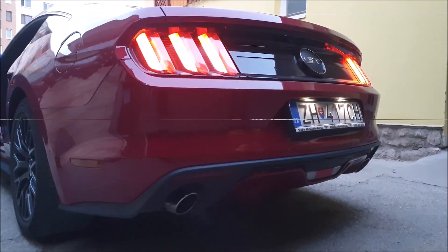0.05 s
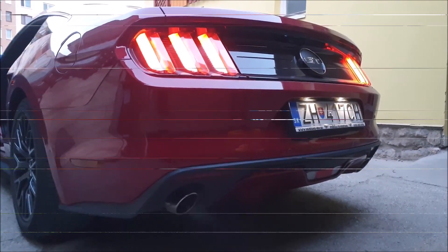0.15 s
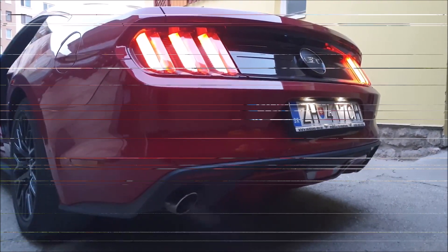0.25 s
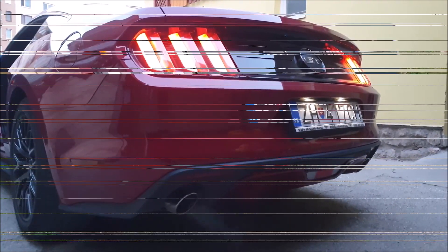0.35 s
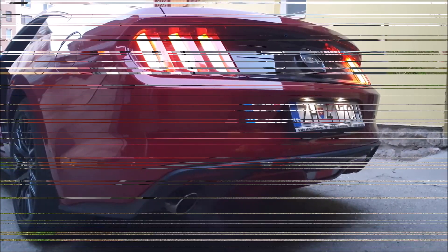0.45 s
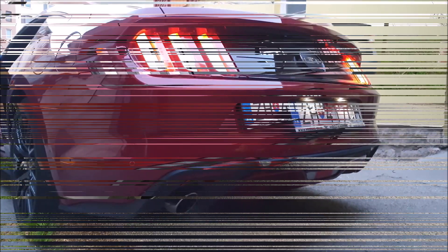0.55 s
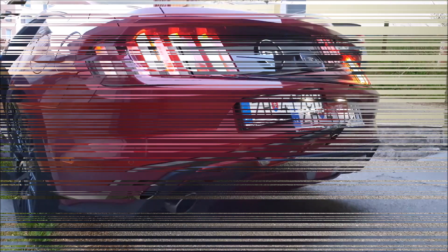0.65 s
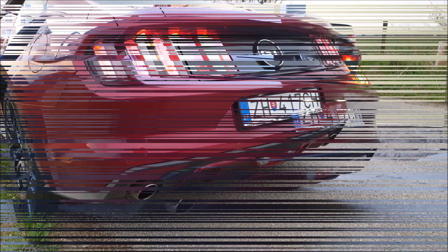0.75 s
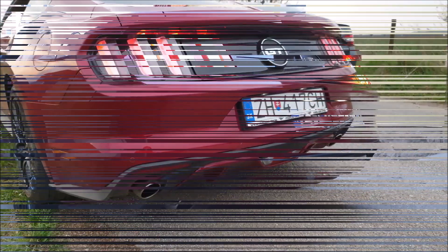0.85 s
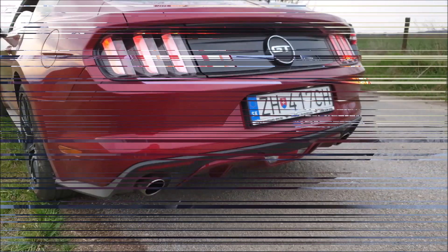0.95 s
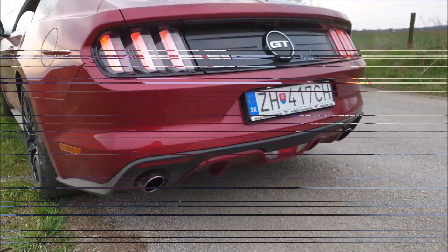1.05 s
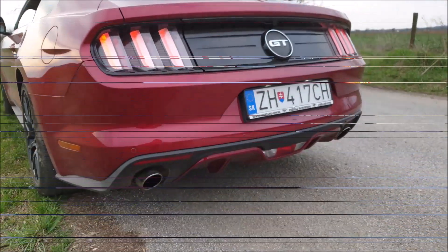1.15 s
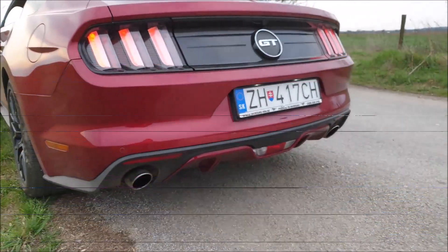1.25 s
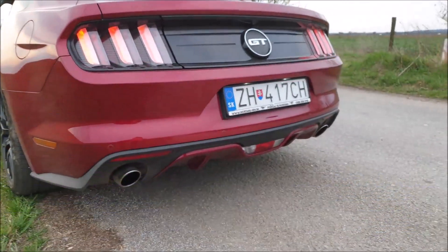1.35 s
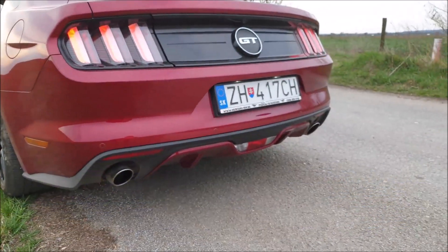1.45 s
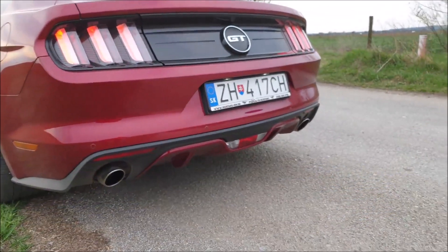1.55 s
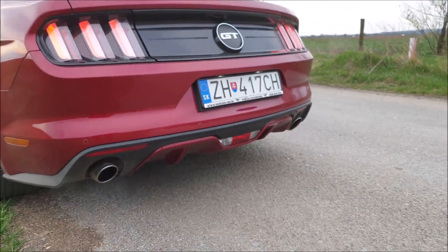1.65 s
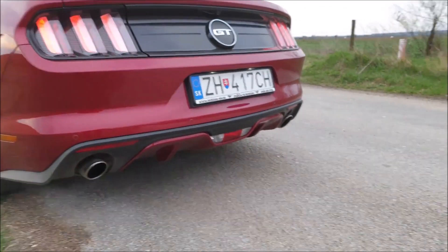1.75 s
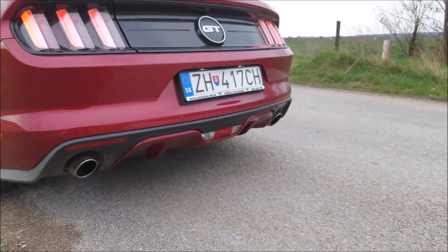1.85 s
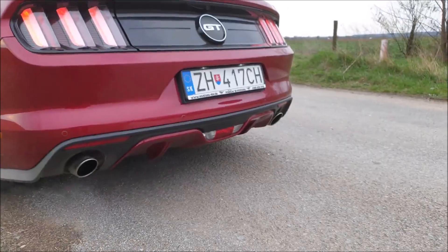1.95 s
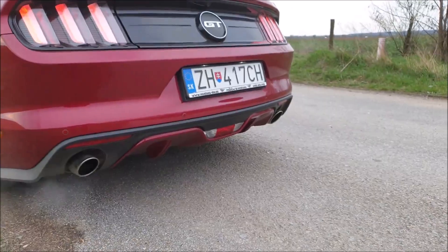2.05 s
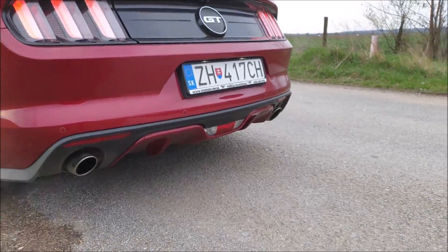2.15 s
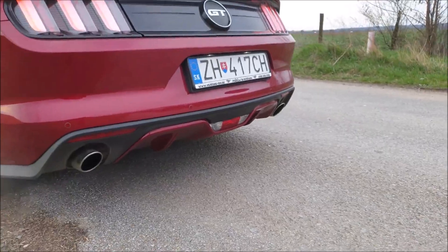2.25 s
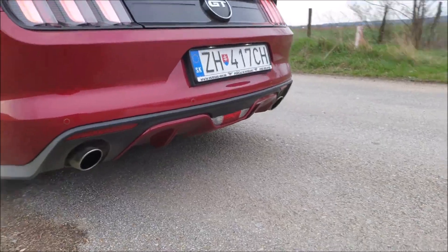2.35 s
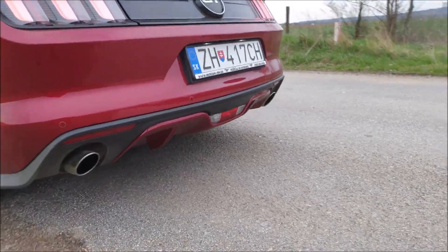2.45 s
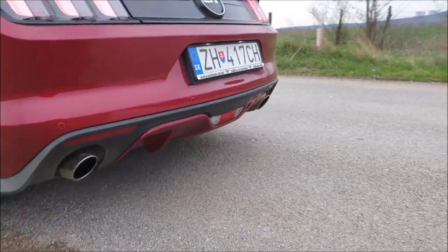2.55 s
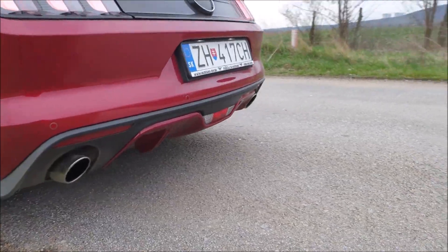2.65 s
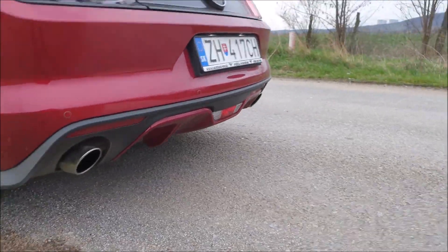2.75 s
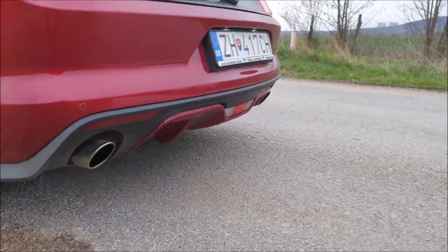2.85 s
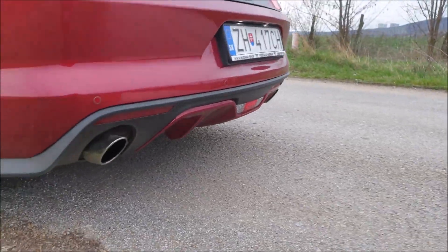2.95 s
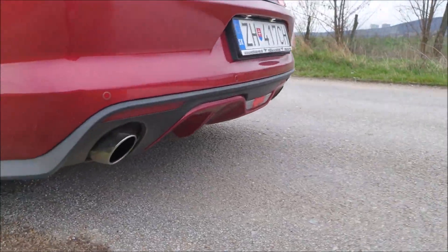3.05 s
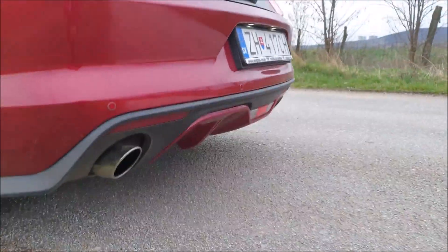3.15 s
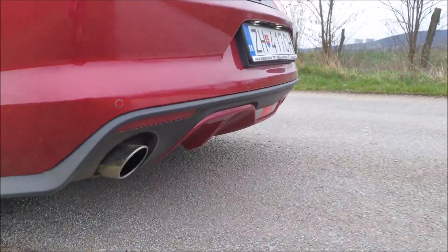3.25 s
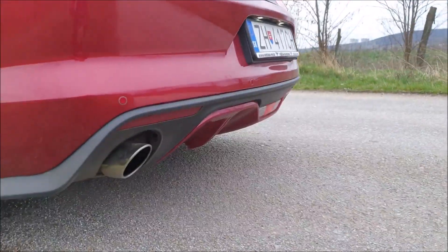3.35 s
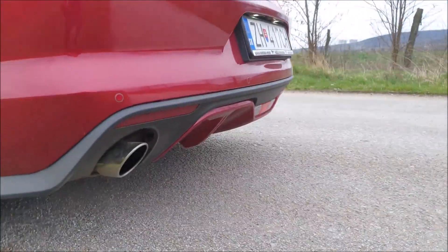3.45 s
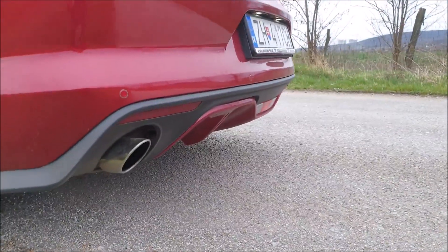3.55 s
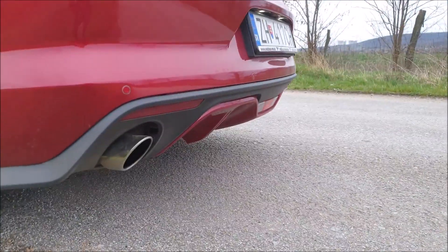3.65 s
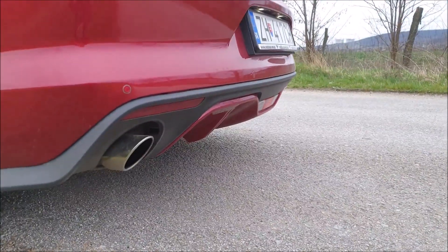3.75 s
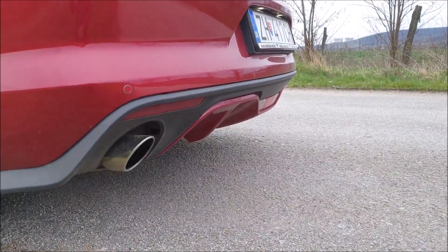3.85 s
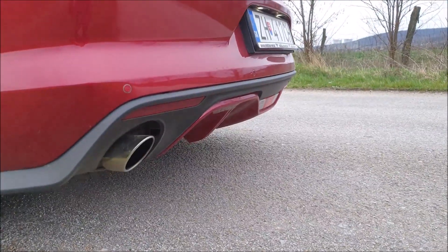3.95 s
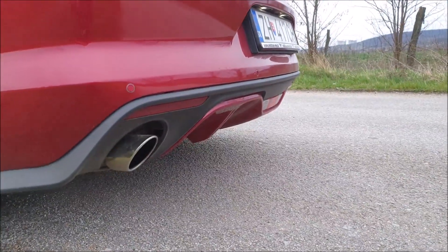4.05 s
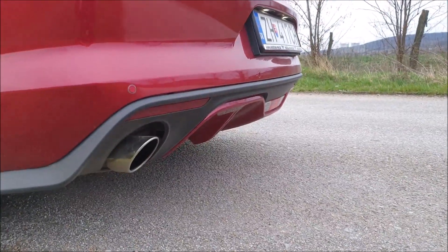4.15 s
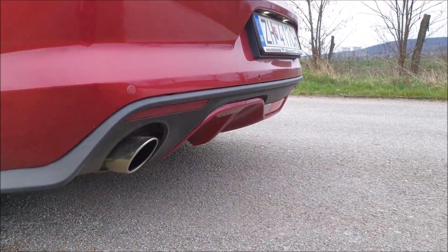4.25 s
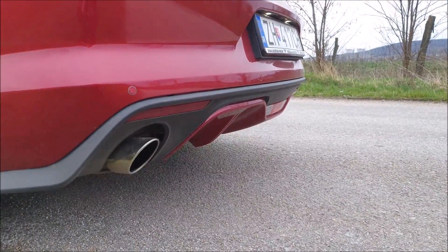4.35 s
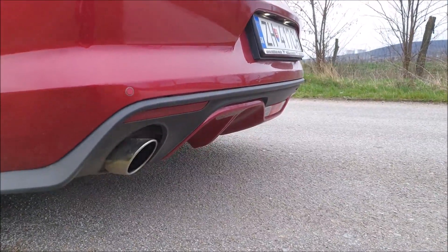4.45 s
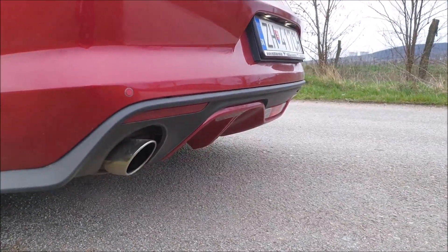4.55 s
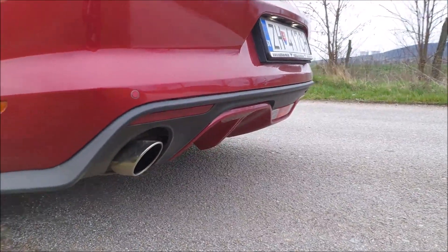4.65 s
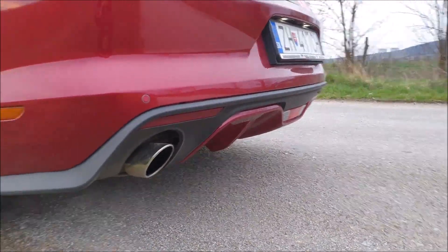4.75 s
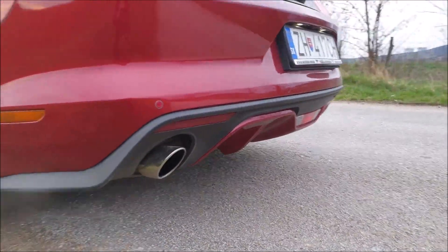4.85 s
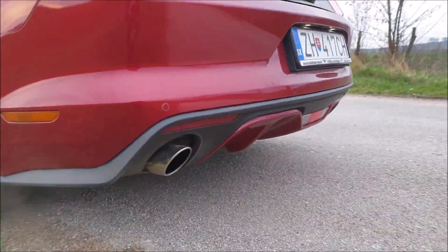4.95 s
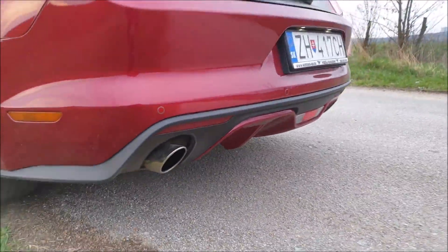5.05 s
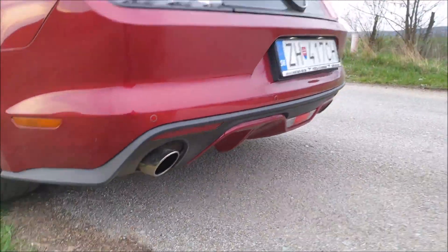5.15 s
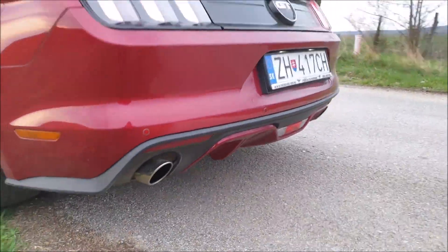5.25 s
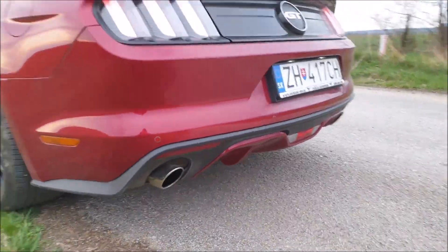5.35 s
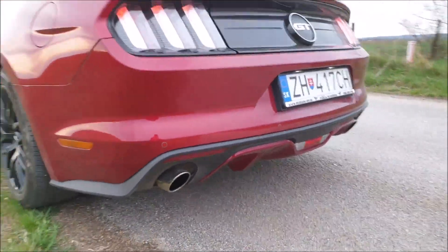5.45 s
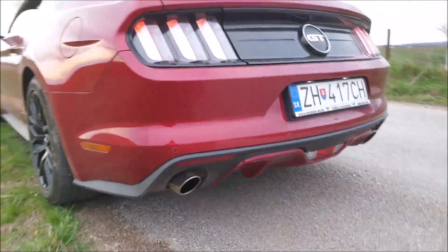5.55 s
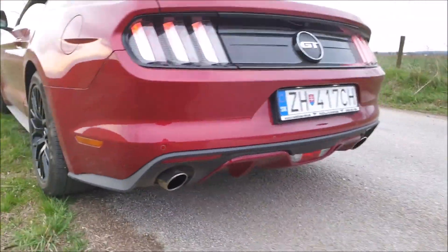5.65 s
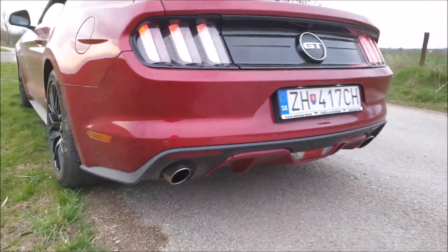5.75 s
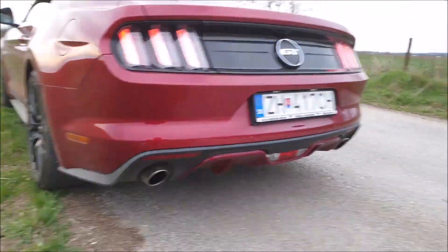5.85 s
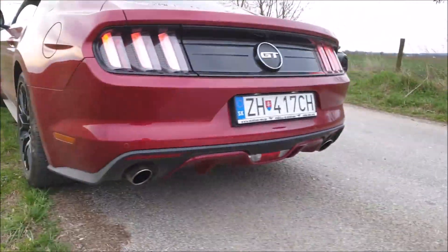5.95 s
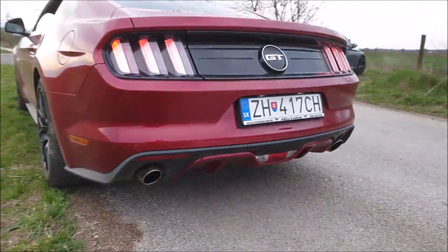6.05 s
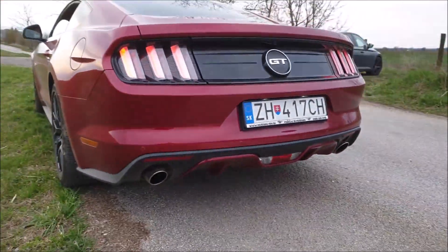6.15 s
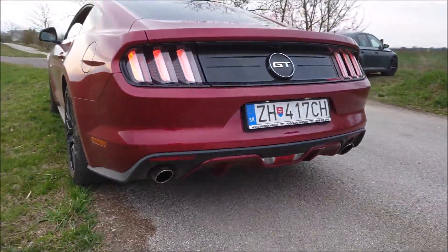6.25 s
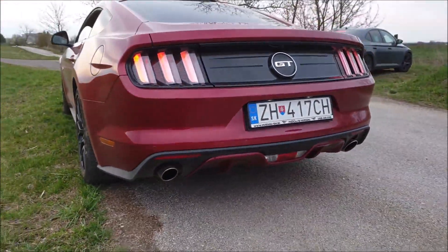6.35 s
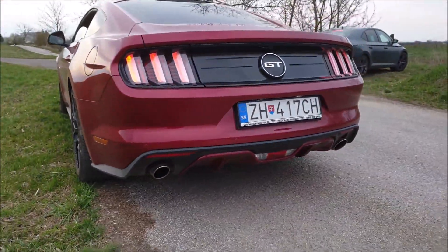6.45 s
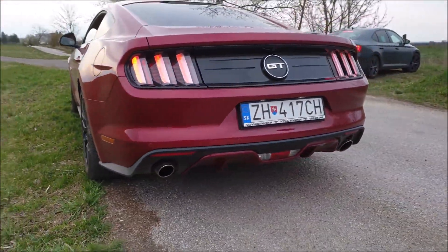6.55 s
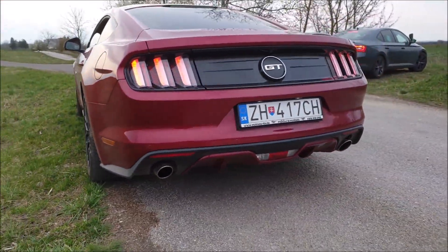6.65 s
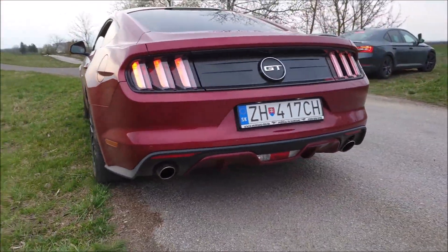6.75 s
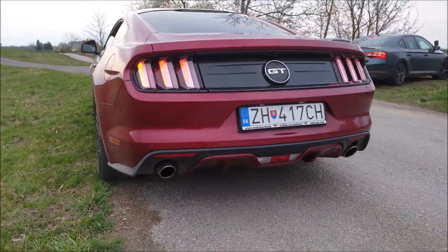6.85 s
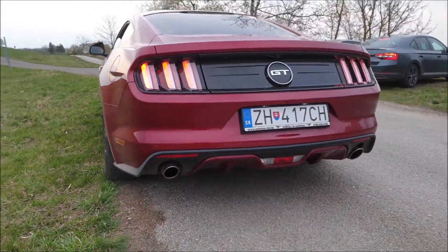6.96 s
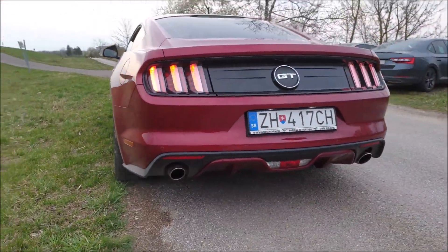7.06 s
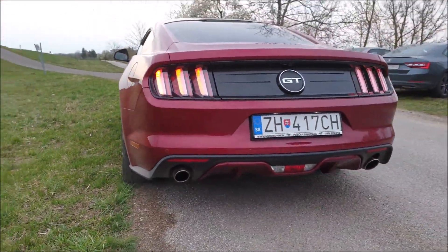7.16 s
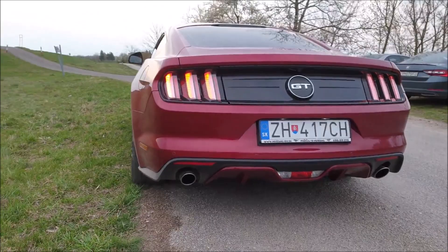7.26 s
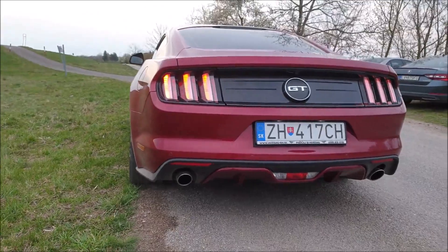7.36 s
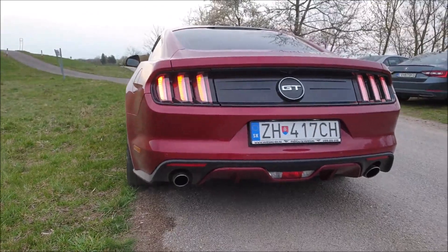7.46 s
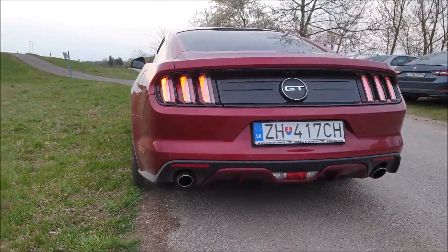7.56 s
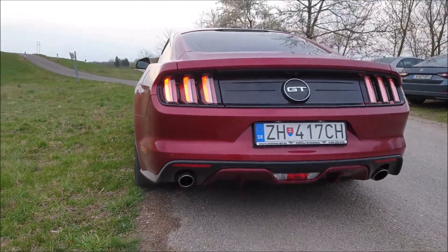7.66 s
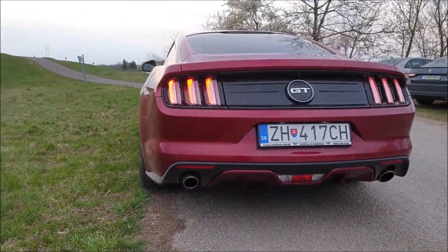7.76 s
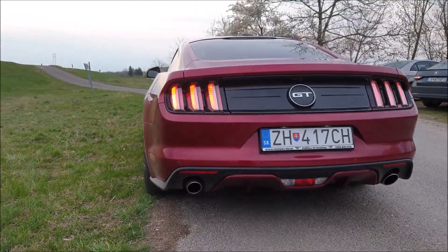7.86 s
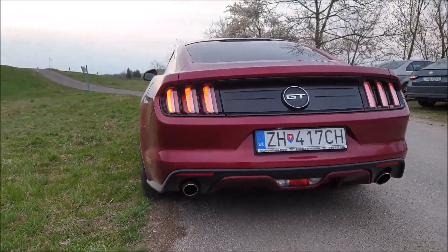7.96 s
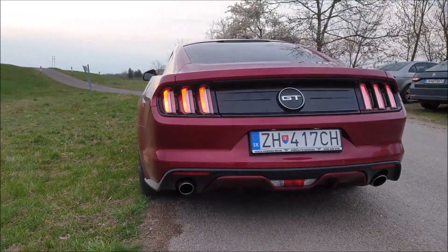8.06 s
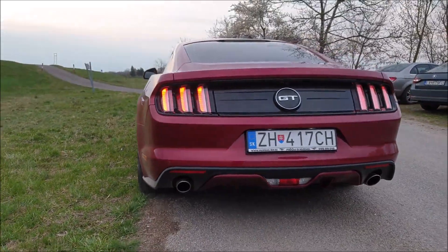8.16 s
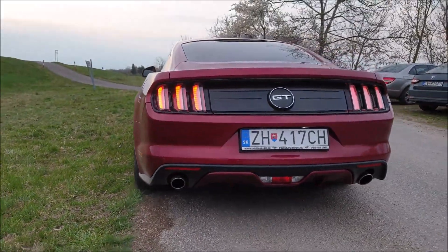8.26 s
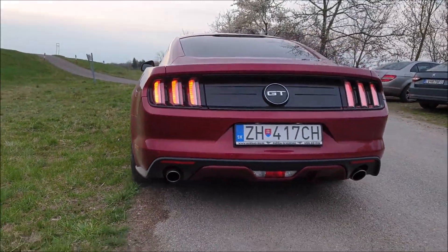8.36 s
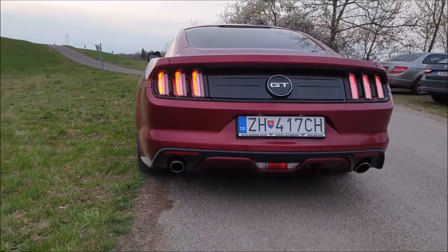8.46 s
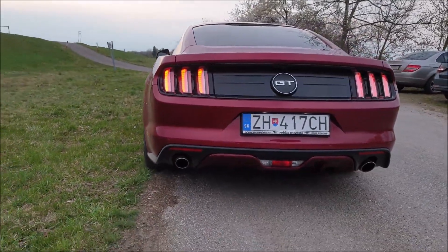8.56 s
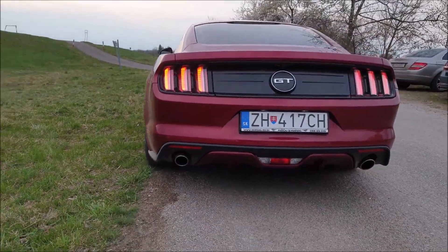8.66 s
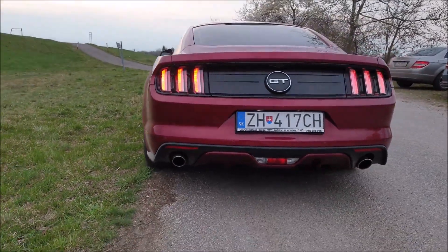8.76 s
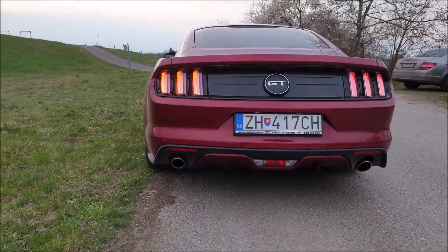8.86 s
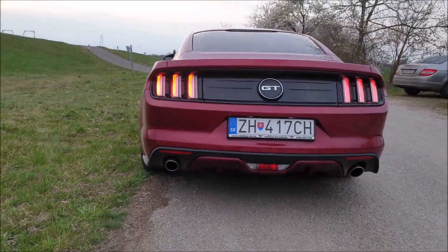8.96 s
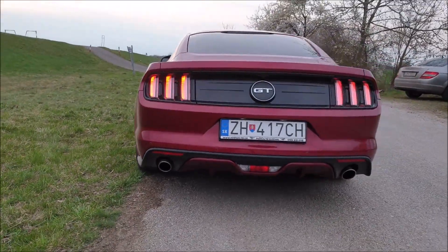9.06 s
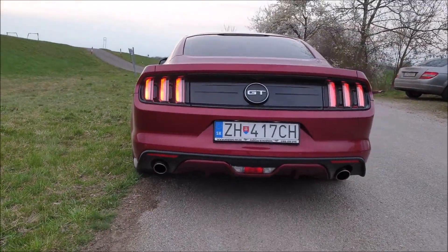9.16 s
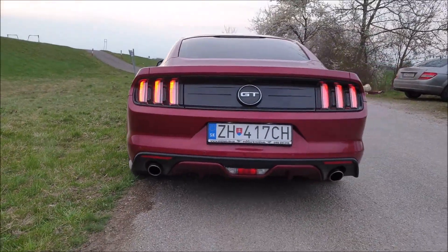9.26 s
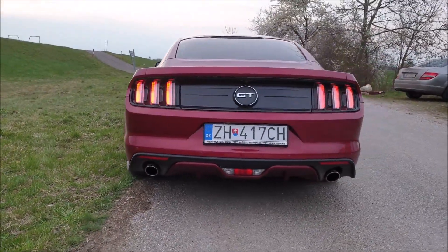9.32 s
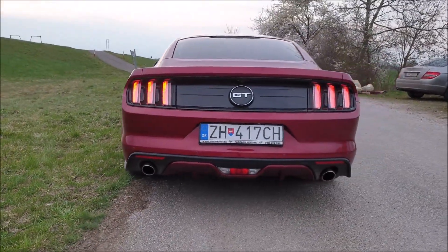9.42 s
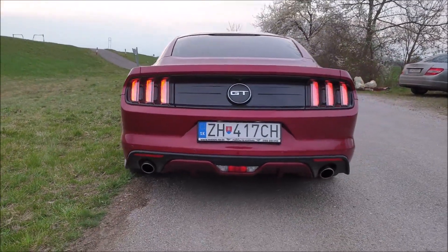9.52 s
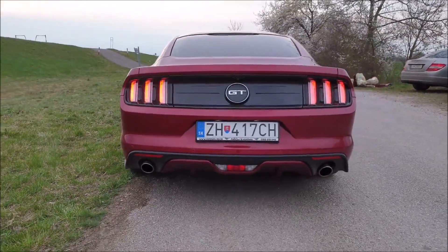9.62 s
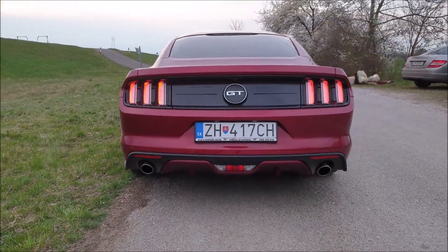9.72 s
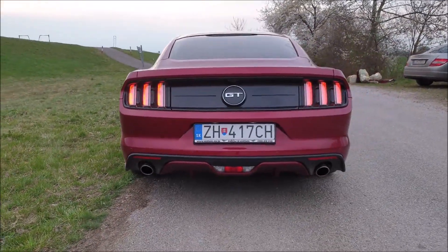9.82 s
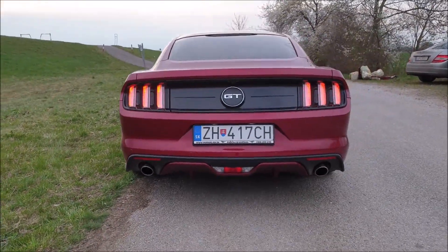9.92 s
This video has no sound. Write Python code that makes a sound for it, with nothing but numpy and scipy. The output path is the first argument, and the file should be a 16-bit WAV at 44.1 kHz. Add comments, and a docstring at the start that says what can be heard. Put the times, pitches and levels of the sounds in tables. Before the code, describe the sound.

Close to a sports car tailpipe: steady quick idle, three raspy revs, popping overrun after each, then a slowing burble as the listener backs away.

```python
"""A V8 idles fast in a yard; that scene ends under a second one on an open road, where the engine is
revved three times near the left tailpipe, crackles as it slows, and burbles while the listener backs away.
Firings give orders of the engine cycle; uneven burning is noise gated by the firings, which rumbles.
Noise through resonances that rise with gas heat makes the pipe ring and the tips rasp; fuel pops are
short bursts of the same noise, and a band of high noise is the jet."""
import sys
import numpy as np
from scipy import signal
from scipy.io import wavfile
from scipy.ndimage import uniform_filter1d, map_coordinates

SR = 44100
rng = np.random.default_rng(int(sys.argv[2]) if len(sys.argv) > 2 else 0)


def dump(signal):
    """Clip the signal to [-1, 1] and save it as 16-bit WAV at the path in sys.argv[1]."""
    limited = np.clip(np.atleast_2d(signal).T, -1, 1)
    pcm = np.round(limited * 32767).astype(np.int16)
    wavfile.write(sys.argv[1], SR, pcm)


N = 440547
T = np.arange(N) / SR
COARSE = 8  # engine orders are computed at one sample in eight

# firing slots, out of eight per cycle, that reach the near pipe: [slot]
NEAR_BANK = [0, 2, 3, 5]
# steadiness of the tips, heard as a steady hiss from farther back: [t/s, share 0-1]
CALM = [(6.6, 0), (7.1, 1)]


def amp(db):
    """Decibels to gain."""
    return 10 ** (np.asarray(db) / 20)


def columns(rows, t=T):
    """Every column of a curve table at the times t."""
    s, *values = np.transpose(rows)
    return [np.interp(t, s, v) for v in values]


def read(points, hz):
    """A spectrum table on a log-frequency axis."""
    f, value = np.transpose(points)
    return np.interp(np.log(hz + 1), np.log(f + 1), value)


def peaks(modes, hz):
    """Gain of a set of resonances with steep skirts."""
    power = 0
    for f, width, db in modes:
        power = power + amp(db) ** 2 / (1 + (2 * (hz - f) / width) ** 2) ** 1.4
    return np.sqrt(power)


def waver(length):
    """Slow chance of rms 1: a smooth curve through random knots 450 values apart."""
    knots = rng.standard_normal(length // 450 + 2)
    slow = map_coordinates(knots, [np.arange(length) / 450], order=3, mode="nearest")
    return slow / slow.std()


def throttle(t):
    """Throttle opening 0-1, and gas heat as a factor on resonances: it builds under load, then cools."""
    # throttle blips: [opens/s, shuts/s, rise of the resonances with heat/share]
    blips = [(.8, 1.28, .1), (2.36, 2.9, .16), (4.82, 5.28, .16)]
    pedal_s, heat_lag_s, cool_s = .14, .08, .15
    opening, heat = 0, 1
    for opens, shuts, rise in blips:
        pressed = np.clip((t - opens) / pedal_s, 0, 1)
        released = np.clip((t - shuts) / pedal_s, 0, 1)
        opening = opening + pressed * (1 - released)
        warmed = np.clip((t - opens - heat_lag_s) / (shuts - opens - heat_lag_s), 0, 1)
        cooling = np.exp(-np.maximum(t - shuts, 0) / cool_s)
        heat = heat + rise * np.sin(np.pi / 2 * warmed ** 0.68) * cooling
    return opening, heat


def gas(shape, size, drift=0):
    """Two-port turbulence of rms 1; hot gas carries sound faster, so the whole spectrum slides up."""
    # likeness of the two ports: [f/Hz, share 0-1]
    likeness = [(30, 0.91), (70, 0.81), (130, 0.96), (500, 0.87), (1200, 0.98), (2500, 0.78), (4500, 0.57),
                (8000, 0.12), (15000, 0.22)]
    # left over right: [f/Hz, level/dB]
    lean_table = [(60, -0.5), (150, -0.5), (380, -2), (950, 1), (2380, -2), (5980, -1.5), (15000, 0)]
    hop = size // 2
    hz = np.fft.rfftfreq(size, 1 / SR)[:, None]
    t = np.arange(N // hop + 5) * hop / SR
    opening, heat = throttle(t)
    # pockets of hot and cool gas, felt less with open throttle and from farther back
    knots_s = np.arange(0, t[-1] + .1, .06)
    pockets = np.interp(t, knots_s, rng.standard_normal(len(knots_s)))
    slide = heat + drift * (1 - 0.76 * opening - columns(CALM, t)[0]) * pockets
    fine_hz = np.arange(0, SR, 5.)
    gain = np.interp(hz / slide, fine_hz, shape(fine_hz))

    a, b, c, d = rng.standard_normal((len(t), len(hz), 4), dtype=np.float32).T
    left, other = a + 1j * b, c + 1j * d
    same = np.clip(read(likeness, hz), 0, 1)
    right = same * left + np.sqrt(1 - same ** 2) * other
    lean = amp(read(lean_table, hz) / 2)
    z = np.array([left * lean, right / lean]) * gain / np.linalg.norm(gain, axis=0)
    out = signal.istft(z.astype(np.complex64), window="cosine", nperseg=size, noverlap=size - hop)[1][:, :N]
    return out / out.std()


def order(k, turns):
    """One order of the cycle at rms 1, phased so that the orders add up to the near bank's pulses."""
    phase = np.angle(sum(amp(-slot) * np.exp(-2j * np.pi * k * slot / 8) for slot in NEAR_BANK))
    spread = .045 * k ** 2  # the long pipe smears each pulse
    return np.sqrt(2) * np.cos(2 * np.pi * k * turns + phase - spread)


def puffs(turns, spread_db, between, size):
    """Envelope, levelled to rms 1, that flares unevenly at near-bank firings; size/samples softens it."""
    slot = (8 * turns).astype(int)
    every = np.arange(slot[-1] + 1)
    strength = amp(spread_db * rng.standard_normal(len(every))) * np.isin(every % 8, NEAR_BANK)
    flare = between + strength[slot] * np.exp(-2.5 * (8 * turns - slot))
    flare = uniform_filter1d(uniform_filter1d(flare, size=size), size=size)
    return flare / np.sqrt(uniform_filter1d(flare ** 2, size=8000))


def yard():
    """Fast even idle: wavering orders of a steady cycle and a soft puffing hiss; it stops short."""
    # engine orders before the fade: [order of the cycle, rms level/dB]
    idle_orders = [(3, -12), (4, -27), (5, -26), (6, -27.5), (7, -20.5), (8, -19), (9, -44), (10, -59),
                   (11, -14.5), (12, -45), (13, -24), (14, -61), (15, -20), (16, -49), (17, -27),
                   (18, -25.5), (19, -55), (20, -32), (21, -32), (23, -37), (24, -58), (26, -56), (27, -65),
                   (30, -53), (31, -37), (32, -37), (34, -52), (35, -34), (36, -68), (50, -69), (53, -60),
                   (54, -48.5), (55, -54.5)]
    # hiss spectrum, relative: [f/Hz, density/dB per Hz]
    hiss_shape = [(150, -34), (250, 1), (287, -1), (366, -5), (427, -18), (563, -13.5), (625, -23),
                  (693, -18.5), (1070, -16), (1230, -23.5), (2250, -29), (3230, -34.5), (15600, -48)]
    # course of the whole idle: [t/s, gain/dB]
    idle_fade = [(0, -2.5), (.6, -3), (.615, -3), (.65, -4.5), (.75, 0), (.9, -1.5), (1.05, 0.5),
                 (1.2, -4.5), (1.38, -3)]
    cycle_hz, end_s, hiss_db = 10.32, 1.3826, -28
    turns = cycle_hz * T + .3
    part = turns[:round(end_s * SR):COARSE]
    tone = sum(amp(db + 1.2 * waver(len(part))) * order(k, part) for k, db in idle_orders)
    tone = signal.resample_poly(tone, COARSE, 1)
    hiss = amp(hiss_db) * puffs(turns, 3.5, 1.0, size=60)
    hiss = hiss * gas(lambda hz: amp(read(hiss_shape, hz)), size=1024)
    fade = amp(columns(idle_fade)[0]) * (T < end_s)
    return (np.pad(tone, (0, N - len(tone))) + hiss) * fade


def beat(hz, turns, place, uneven):
    """Orders at rms 1 before break-up: throttle and place balance them, the silencer colours them."""
    # balance of orders 1 to 18, one row each, relative: [open throttle/dB, shut throttle/dB,
    # a few steps back/dB, between both pipes/dB, loping near idle/dB]
    balance = [(10.5, -3, -15, -30, -30), (-1.5, -45, -20, -29, -19), (2.5, 1, -0.5, -14, -6),
               (-17, -53, -24, -1.5, -4), (5, -1.5, -4.5, -25, -33), (1, -33, -19, -4, 5.5),
               (-7, -11, -28, -18, -29), (-2, -12.5, -14, 2, -3.5), (-8, -14.5, -15, -8, -17),
               (-2, -15, -10.5, -9, -2), (-9, -15.5, -17, -7, -30), (-1.5, -19, -27, -36, -16),
               (-24, -41, -23, -13, -17), (-12.5, -39, -34, -7.5, -22), (-1, -22.5, -42, -19, -15),
               (-8, -46, -35, -24, -29), (-14.5, -47, -28, -36, -36), (-8, -57, -40, -28, -22)]
    # orders 19 to 26, same columns
    top_orders = [(-11, -45, -45, -45, -45)] * 8
    # silencer response: [f in cool gas/Hz, gain/dB]
    silencer = [(30, -17), (55, -3), (95, -0.5), (125, 1.5), (160, 7.5), (190, 2.5), (225, 3.5), (262, -3),
                (290, 5.5), (320, 3), (345, 1), (375, -3), (420, 2.5), (480, -13.5), (635, 2.5), (705, -4),
                (772, 3), (900, -14.5), (1200, 8), (1500, -14)]
    # loping balance while leaving idle: [t/s, share 0-1]
    lope_curve = [(.93, 1), (1.03, 0)]
    turning = 3  # this order reverses its phase as the throttle shuts
    heat = throttle(T)[1]
    hz, turns, place, uneven, heat = (v[::COARSE] for v in (hz, turns, place, uneven, heat))
    lope = columns(lope_curve, T[::COARSE])[0]
    out, power = 0, 0
    for k, dbs in enumerate(balance + top_orders, 1):
        placed = np.interp(place, np.arange(len(dbs)), amp(dbs))
        size = (1 - lope) * placed + lope * amp(dbs[-1])
        size = size * amp(read(silencer, k * hz / heat))
        gain = size * np.clip(2 * place - 1, -1, 1) if k == turning else size
        broken = amp((.5 + 2.5 * uneven) * (waver(len(hz)) - .2))
        out = out + gain * broken * order(k, turns)
        power = power + size ** 2
    return signal.resample_poly(out / np.sqrt(power), COARSE, 1)[:N]


def boom(turns, opening, sputter, lumps, calm, rumble):
    """Low exhaust note: even burning beats in orders, uneven burning puffs the rumble."""
    # engine speed: [t/s, cycle rate/Hz]
    speed = [(.6, 10.2), (.71, 14.2), (.8, 19.5), (.9, 25), (1.05, 27.5), (1.18, 36.6), (1.3, 41.6),
             (1.38, 41.4), (2.2, 31), (2.4, 31.2), (2.55, 36), (2.87, 57), (2.95, 57.8), (4, 40.6),
             (4.5, 34.5), (4.82, 31.6), (4.95, 35), (5.27, 57.2), (5.4, 57.2), (6.1, 44.6), (6.7, 36.1),
             (6.87, 33.6), (7.24, 30.6), (7.55, 27.2), (8.6, 18.5), (9.35, 13.6), (9.99, 11)]
    # boom: [t/s, level/dB]
    boom_level = [(.6, -33), (.65, -13), (.69, -19.5), (.74, -12.5), (.82, -13.5), (.9, -7.5), (.98, -10.5),
                  (1.06, -12), (1.2, -11), (1.3, -14.5), (1.37, -23), (1.43, -25), (1.55, -20.5),
                  (1.7, -18), (2.3, -23.5), (2.56, -10.5), (2.7, -11), (3.29, -16), (3.5, -11.5),
                  (4.2, -18), (4.6, -18.5), (4.75, -21.5), (4.99, -9.5), (5.6, -16), (6.05, -16.5),
                  (6.35, -21), (6.65, -22.5), (6.9, -22), (7.1, -24.5), (7.4, -24.5), (7.85, -23.5),
                  (8.08, -24), (8.16, -28), (8.3, -24.5), (8.7, -18.5), (8.95, -20.5), (9.15, -22.5),
                  (9.33, -21), (9.46, -25), (9.55, -23), (9.66, -30), (9.8, -27), (9.91, -31), (9.99, -33)]
    # uneven burning in the boom, low under load, ragged when coasting: [t/s, share 0-1]
    uneven_curve = [(.6, .25), (.93, .25), (1, .45), (1.1, .3), (1.3, .15), (1.38, .8), (2.1, .7),
                    (2.2, .05), (2.8, .03), (3, .25), (3.25, .08), (3.5, .15), (3.9, .3), (4.15, .65),
                    (4.65, .65), (4.75, .05), (5.2, .05), (5.3, .25), (5.9, .22), (6.3, .85), (6.7, .8),
                    (7.1, .5), (7.8, .55), (8, .8), (8.5, .75), (8.65, .2), (9, .25), (9.4, .3), (9.6, .6),
                    (9.7, .9)]
    # listener's place, as a column of the balance with shut throttle: [t/s, column]
    place_curve = [(6.4, 1), (6.8, 2), (7.9, 2), (8.3, 3), (9.1, 3), (9.3, 4)]
    uneven = columns(uneven_curve)[0]
    place = columns(place_curve)[0] - opening
    even_part = np.sqrt(1 - uneven) * beat(columns(speed)[0], turns, place, uneven)
    steadiness = 1 - calm + calm * np.sqrt(sputter)
    ragged_part = np.sqrt(uneven) * steadiness * puffs(turns, 3.5, lumps, size=300) * rumble
    return amp(columns(boom_level)[0]) * (even_part + ragged_part)


def pipe_ring(turns, sputter, lumps, crack, thump):
    """Gas puffs and pops drive noise through the pipe's resonances, with a narrow hum on top."""
    # pipe resonances of cool gas, broad and narrow: [f/Hz, width/Hz, level/dB]
    ring_modes = [(762, 28.5, 1), (790, 840, -11.5), (1169.5, 113, 1.5), (1357, 50, -3), (2340, 610, -21)]
    # hum resonances of cool gas: [f/Hz, width/Hz, level/dB]
    hum_modes = [(432, 22, -9), (632, 12, 2)]
    # drive of the ring by the flow: [t/s, level/dB]
    ring_level = [(0.6, -48), (0.78, -37.5), (1.12, -17.5), (1.33, -31.5), (1.83, -32.5), (2.14, -38.5),
                  (2.4, -42), (2.51, -26.5), (2.64, -19.5), (2.69, -22), (2.87, -21), (3.16, -28),
                  (3.87, -25), (4.49, -35.5), (4.65, -36.5), (4.92, -42), (5.07, -24.5), (5.15, -20.5),
                  (5.7, -30.5), (6.25, -31), (6.85, -36.5), (6.98, -43), (8.39, -44.5), (8.57, -44),
                  (9.73, -51), (9.99, -57)]
    # hum over the broad ring: [t/s, gain/dB]
    hum_level = [(.6, -5.5), (1.3, -6.5), (1.6, -10.5), (2.4, -8), (2.7, -7.5), (3.3, -8), (4.6, 1.5),
                 (4.9, -8), (5.3, -4), (5.6, -9.5), (7, -3), (7.5, 1.5), (8.2, -7.5), (8.7, 2.5),
                 (9.2, -10.5), (9.99, -10)]
    pop_db, thump_db = -6, -22  # how hard crack and thump knock the pipe
    blown = amp(columns(ring_level)[0]) * np.sqrt(sputter) * puffs(turns, 4, lumps, size=80)
    blown = blown + amp(pop_db) * crack + amp(thump_db) * thump
    broad = blown * gas(lambda hz: peaks(ring_modes, hz), size=1024)
    hum = uniform_filter1d(blown, size=250) * gas(lambda hz: peaks(hum_modes, hz), size=4096)
    return broad + amp(columns(hum_level)[0]) * hum


def rasp(flow_db, flare, calm, cracks):
    """Flow and pops excite three groups of tailpipe resonances, each flaring and lapsing on its own."""
    # tip resonances of cool gas in groups low, middle, high: [f/Hz, width/Hz, level/dB]
    tip_groups = [
        [(1950, 450, -11), (2507, 150, 0)],
        [(3190, 200, 0), (3750, 290, -9)],
        [(4230, 240, 0), (4600, 330, -7), (5250, 400, -11), (5900, 900, -15)],
    ]
    # share of the groups in steady flow: [low/dB, middle/dB]
    flow_share = [-14.5, -3]
    # high group in steady flow: [t/s, share/dB]
    high_flow = [(.6, -7.5), (1.2, -6.5), (2.1, -10.5), (2.4, -16), (2.62, -8), (2.9, -9), (3.3, -6.5),
                 (4, -6), (4.8, -4), (5.2, -2), (6.3, -3), (7.1, 3), (7.5, 4.5), (8.1, -1), (8.4, -3),
                 (9.2, -8.5), (9.5, -8), (9.99, -10)]
    # share of the groups in a pop, before a common factor: [low/dB, middle/dB, high/dB]
    pop_share = [-9.5, -4.5, -3]
    calm_low_db, patchy_db = 6, 2.5
    # the low tips carry better to a listener farther back
    shares = [flow_share[0] + calm_low_db * calm, flow_share[1], *columns(high_flow)]
    out = 0
    for modes, share_db, pop_db, crack in zip(tip_groups, shares, pop_share, cracks):
        patchy = patchy_db * np.repeat(waver(N), 2)[:N]
        drive = amp(flow_db + share_db + patchy) * flare + 0.54 * amp(pop_db) * crack
        out = out + drive * gas(lambda hz: peaks(modes, hz), size=512, drift=.035)
    return out


def jet(flow_db, flare, spit):
    """High noise of the jet, falling faster than the flow down to a faint hiss, plus the spit of pops."""
    # jet spectrum in cool gas, relative: [f/Hz, density/dB per Hz]
    jet_shape = [(4590, -60), (7800, -3), (10200, 1), (11600, 1), (13900, -3), (15600, -7)]
    # jet at full flow: [t/s, level/dB]
    jet_level = [(1.1, -30), (2.7, -35.5), (4, -25), (5.1, -26.5), (6.5, -20)]
    full_flow_db, faint_db = -21, -51  # faint_db: remaining hiss at full flow
    below_db = flow_db - full_flow_db
    strong_db = columns(jet_level)[0] + 1.5 * below_db
    level_db = np.maximum(strong_db, faint_db + 0.45 * below_db)
    return (amp(level_db) * flare + .45 * spit) * gas(lambda hz: amp(read(jet_shape, hz)), size=256)


def pops():
    """Fuel igniting in the pipe: envelopes of three cracks, jet and thump that flare, burn and die."""
    # afterfire pops: [t/s, crack/dB, high tips over crack/dB, jet over crack/dB, thump/dB, burn/s]
    pop_table = [(1.531, -24.5, -1, -6, -34, 0.034), (1.5776, -15.5, -4.5, -10, -8, 0.0094),
                 (1.643, -15.5, -3, -8.5, -17, 0.049), (1.671, -15.5, 7, 1, -30, 0.01),
                 (1.702, -23, -5.0, 0, -26, 0.016), (1.746, -16, 1, -3.5, -22, 0.019),
                 (1.8104, -17, -9, -10, -17, 0.028), (1.865, -18.5, -5, -14.0, -17, 0.021),
                 (1.915, -17, 1.5, -8, -17, 0.016), (1.947, -18, -3, -17, -37, 0.024),
                 (1.9977, -27, -22, -36, -17, 0.022), (2.15, -30, -21, -23, -17, 0.012),
                 (2.4384, -44.0, -15, -9, -25, 0.027), (2.47, -41, -19, -28.0, -11, 0.021),
                 (2.5014, -17.5, 2, -26, -15, 0.008), (2.5306, -17, 2, -9, -20, 0.016),
                 (2.9557, -20, 1, -1, -12.5, 0.041), (3.013, -25.5, 0, 0, -19, 0.22),
                 (3.132, -16, -4, -4, -29.0, 0.014), (3.1567, -15.5, 0, 0, -22, 0.0066),
                 (3.362, -22.5, -2, -6, -27, 0.033), (3.434, -23.5, -5, -6, -19, 0.067),
                 (3.468, -23, -4, -7, -25, 0.087), (3.5448, -37, -11.0, -8, -28, 0.033),
                 (3.573, -16, -7, -7.5, -16, 0.057), (3.662, -17, -10, -13, -40, 0.047),
                 (3.699, -25.5, -2, -2, -36, 0.048), (3.746, -45, -9, -9, -17, 0.055),
                 (3.803, -24, 4, 0.0, -33, 0.016), (3.839, -33, 6, 0, -34.0, 0.013),
                 (3.902, -21, -6, -6, -13, 0.043), (3.921, -20.5, 9, 0, -38, 0.019),
                 (3.9808, -20, -2, -3, -16, 0.046), (4.0194, -20, -9, -14, -14, 0.013),
                 (4.081, -17, -1, -6, -24, 0.022), (4.2072, -20, -5, -10, -17, 0.034),
                 (4.231, -31.5, 6, 7, -24, 0.013), (4.324, -12.5, -8.0, -16, -11, 0.0093),
                 (4.397, -22.5, -17, -30, -30, 0.026), (4.4544, -30, 4, -12, -35, 0.009),
                 (4.514, -51, -8, -17, -27, 0.011), (4.552, -20, -3.5, -13, -18, 0.03),
                 (4.8995, -25.5, -21, -31, -15, 0.043), (4.9305, -15.5, -7, -13, -10, 0.017),
                 (4.961, -18.5, -3, -11, -38, 0.31), (5.349, -31, -4, 2, -26, 0.047),
                 (5.388, -26, 8, 5, -12, 0.021), (5.4976, -23, 8, -2, -35.0, 0.035),
                 (5.5348, -20.5, 0, -5, -36, 0.043), (5.597, -19.5, 1, -9, -42, 0.054),
                 (5.674, -17.5, 3, -7, -39, 0.016), (5.793, -21, 4, -17.0, -51, 0.009),
                 (5.815, -35, 9, -1, -25, 0.088), (5.896, -20.0, 8, -6, -35, 0.013),
                 (5.9488, -17.5, 5, -5, -14, 0.0093), (5.98, -21.5, 3, -1.5, -26, 0.054),
                 (6.0666, -29, 7.5, 1, -27, 0.045), (6.1235, -28.5, 5, -1, -43, 0.16),
                 (6.168, -25, -2, -2, -28, 0.037), (6.2144, -33, -3, -10, -48, 0.15),
                 (6.279, -26.5, 2, -8, -18, 0.011), (6.344, -27.5, 1, -12, -35, 0.035),
                 (6.38, -19, -6, -8, -33, 0.014), (6.455, -21.5, 3.5, -3, -18, 0.027),
                 (6.5856, -51, -10, -18.0, -13.5, 0.021), (6.789, -50, -7, -14.0, -18, 0.023),
                 (6.86, -29, -13, -24, -18, 0.016), (6.9315, -17, 2, -4.5, -25, 0.023),
                 (7.1084, -36, -6, -17, -34, 0.018), (7.3675, -54, -9, -2, -26, 0.11),
                 (7.591, -56, -1.0, -16.0, -18, 0.017), (7.8045, -58, -3, -16, -50, 0.018),
                 (7.882, -35, -5, -21.0, -9, 0.0085), (8.048, -62, -1, -14.0, -16, 0.0083),
                 (8.099, -61, -6, -14.0, -28, 0.01), (8.3034, -62, -4, -3, -28, 0.034),
                 (8.353, -59, -8, -14.0, -33, 0.0093), (8.7284, -56, 1, 8, -38, 0.013),
                 (8.9412, -40, -6, -6, -14, 0.01), (8.971, -40, 1.0, 0, -43, 0.01),
                 (9.2424, -39, -5.0, -4, -43, 0.01), (9.297, -40, -5, -6, -27, 0.025),
                 (9.349, -41, 5, 0, -32, 0.0098), (9.388, -43, -2.0, -10, -38, 0.015),
                 (9.4635, -39.5, -1, -3, -44, 0.013), (9.594, -45, -3.0, -8.0, -29, 0.008),
                 (9.667, -55.0, -14.0, -17.0, -11, 0.0046), (9.6782, -34, -18, -18, -26, 0.0052),
                 (9.743, -57, -6.0, -12.0, -13.5, 0.0093), (9.811, -44, -10, -12.0, -24, 0.0085)]
    rise_s, burn_sag_db, crack_t60_s = 0.0018, -10, 0.088
    spike_db, spike_s = 5, .003  # extra crack at ignition
    tint_db, grit_db = 4.5, 3.2  # variety of the middle tips, stutter of the burn
    out = np.zeros((5, N + 6000))
    age = np.arange(6000) / SR
    rise = (1 - np.exp(-age / rise_s)) * amp(spike_db * np.exp(-age / spike_s))
    for s, db, high_db, jet_db, thump_db, burn in pop_table:
        mid_db = tint_db * rng.uniform(-1.7, 1)
        # loss in dB: slight while burning, steep after it
        decay = 60 * np.maximum(age - burn, 0) / crack_t60_s - burn_sag_db * np.minimum(age / burn, 1)
        levels = [db - decay, db + mid_db - decay, db + high_db - decay,
                  db + jet_db - 1.4 * decay, thump_db - 2.12 * decay]
        out[:, round(s * SR):][:, :6000] += rise * amp(levels)
    grit = signal.resample_poly(rng.standard_normal(N // 60 + 1), 60, 1)[:N]
    stutter = amp(grit_db * (grit - 1.0))
    return (*(out[:4, :N] * stutter), out[4, :N])


def road():
    """Boom, pop thumps, ring of the pipe, rasp and jet, all driven by one engine cycle."""
    # engine speed: [t/s, cycle rate/Hz]
    speed = [(.6, 10.2), (.71, 14.2), (.8, 19.5), (.9, 25), (1.05, 27.5), (1.18, 36.6), (1.3, 41.6),
             (1.38, 41.4), (2.2, 31), (2.4, 31.2), (2.55, 36), (2.87, 57), (2.95, 57.8), (4, 40.6),
             (4.5, 34.5), (4.82, 31.6), (4.95, 35), (5.27, 57.2), (5.4, 57.2), (6.1, 44.6), (6.7, 36.1),
             (6.87, 33.6), (7.24, 30.6), (7.55, 27.2), (8.6, 18.5), (9.35, 13.6), (9.99, 11)]
    # rumble spectrum in cool gas, relative: [f/Hz, density/dB per Hz]
    rumble_shape = [(15, -41), (25, 10), (70, 6), (123, 3.5), (172, 5), (253, 0), (285, 2), (343, 1.5),
                    (382, -9.5), (425, -1.5), (512, -23), (600, -12), (780, -49), (1320, -120)]
    # rush of gas at the tips: [t/s, level/dB]
    flow = [(.6, -71), (.8, -56), (.96, -28.5), (1.15, -20), (1.28, -24), (1.43, -56.5), (1.56, -40),
            (1.93, -36.5), (2.1, -53), (2.35, -62), (2.58, -18.5), (2.7, -15.5), (2.89, -16), (2.94, -23),
            (3, -25), (3.14, -33), (3.28, -45), (3.45, -29.5), (4.08, -37), (4.2, -44.5), (4.5, -51),
            (4.81, -63), (4.94, -43.5), (5.08, -20.5), (5.2, -22.5), (5.57, -39.5), (5.75, -44),
            (5.9, -35.5), (6.3, -47), (6.5, -45), (7.05, -66), (7.3, -70), (7.7, -64.5), (8.3, -66.5),
            (8.8, -58), (9.35, -63), (9.6, -66), (9.75, -81), (9.99, -82)]
    # flow between firings, added to each flare: [t/s, share of a firing]
    lump_curve = [(6.5, 1.1), (7.2, .6)]
    start_s, sputter_db = .6, 3.8
    opening = throttle(T)[0]
    turns = np.cumsum(columns(speed)[0]) / SR
    flow_db, lumps, calm = columns(flow)[0], columns(lump_curve)[0], columns(CALM)[0]
    # the flow sputters while coasting
    sputter = amp(sputter_db * (1 - opening) * np.repeat(waver(N // 4 + 1), 4)[:N])
    low_crack, mid_crack, high_crack, spit, thump = pops()
    rumble = gas(lambda hz: amp(read(rumble_shape, hz)), size=2048)
    flare = sputter * puffs(turns, 3, .9 - .15 * opening, size=40)
    flare = .7 * calm + (1 - .7 * calm) * flare
    out = boom(turns, opening, sputter, lumps, calm, rumble)
    out = out + uniform_filter1d(thump, size=200) * rumble
    out = out + pipe_ring(turns, sputter, lumps, low_crack, thump)
    out = out + rasp(flow_db, flare, calm, (low_crack, mid_crack, high_crack))
    out = out + jet(flow_db, flare, spit)
    return out * np.clip((T - start_s) / 0.029, 0, 1)


def scene():
    """Both scenes at two microphone ports, the left one nearer the pipe, over a distant outdoor hush."""
    # lead of the left port: [t/s, lead/samples]
    lead = [(0, 3.9), (1, 3.56), (2.2, 6.14), (3.5, 6.47), (5, 4.42), (7.5, 3.84), (9.99, 5.7)]
    air_db, air_hz = -51.5, 2110  # gain on unit noise before its low-pass, corner
    left, right = yard() + road()
    late = map_coordinates(right, [np.arange(N) - columns(lead)[0]], order=3, mode="nearest")
    dull = signal.butter(1, air_hz, fs=SR, output="sos")
    air = signal.sosfilt(dull, rng.standard_normal((2, N)))
    return np.array([amp(-0.83) * left, amp(-2.14) * late]) + amp(air_db) * air


def record(dry):
    """The microphone loses the deepest bass; full-scale clipping, then the band limit."""
    bass_hz, edge_hz = 41, 15730
    thin = signal.sosfilt(signal.butter(8, bass_hz, "high", fs=SR, output="sos"), dry)
    taps = signal.firwin(1023, edge_hz, window=("kaiser", 10), fs=SR)
    return signal.oaconvolve(thin.clip(-1, 1), taps[None], "same", axes=1)


dry = scene()
out = record(dry)
dump(out)
```